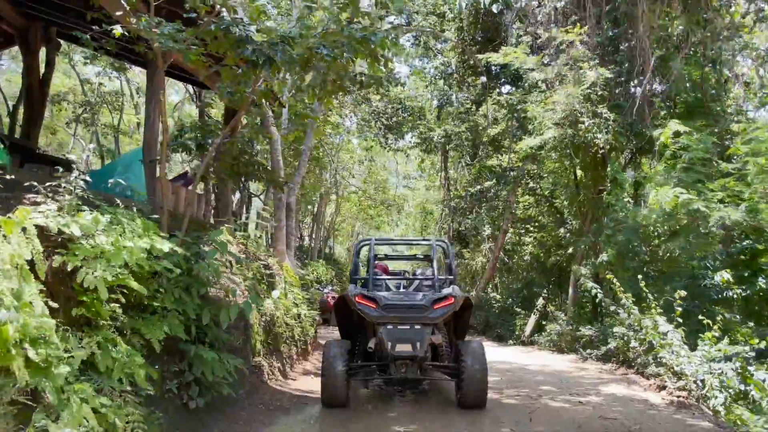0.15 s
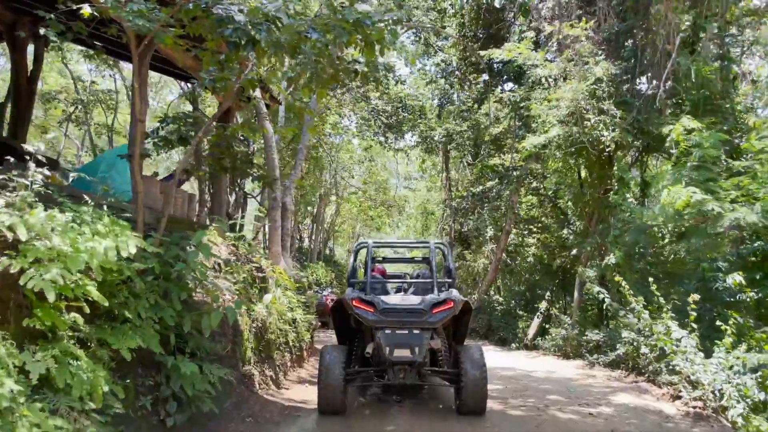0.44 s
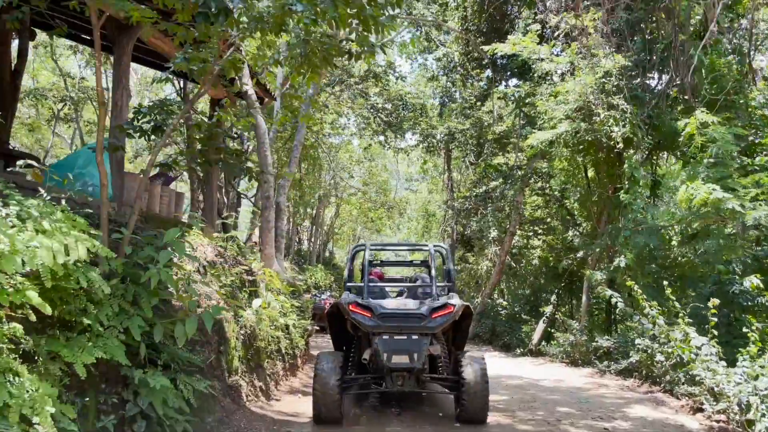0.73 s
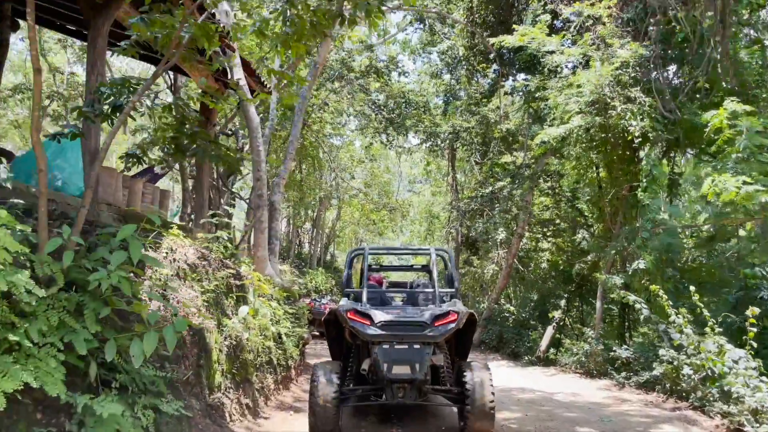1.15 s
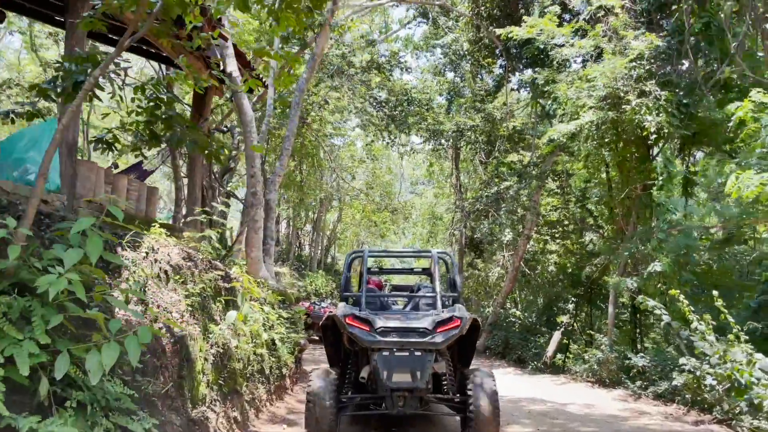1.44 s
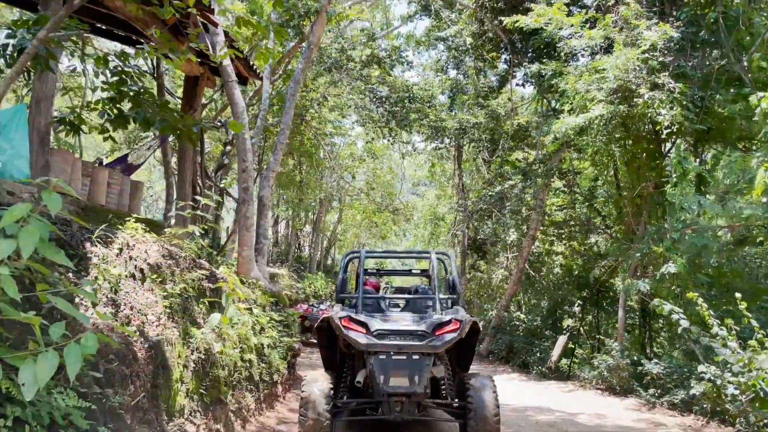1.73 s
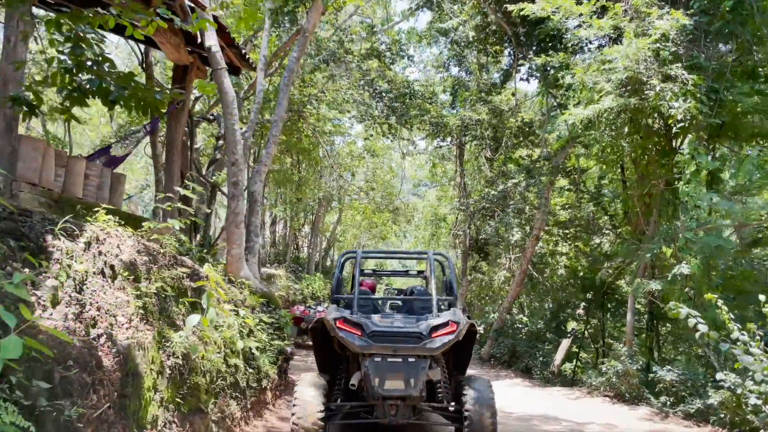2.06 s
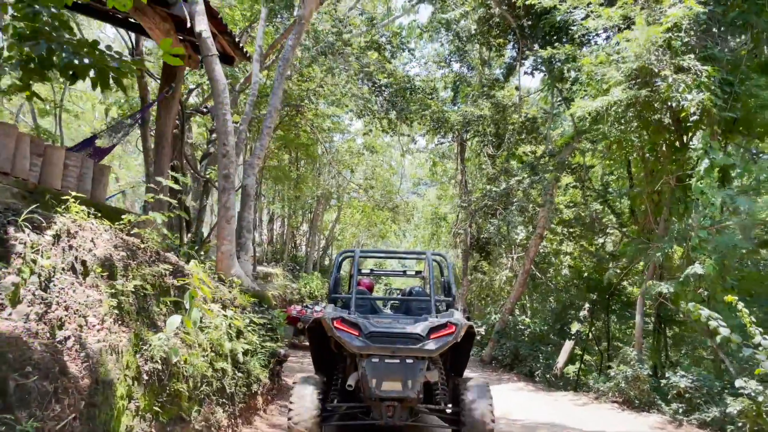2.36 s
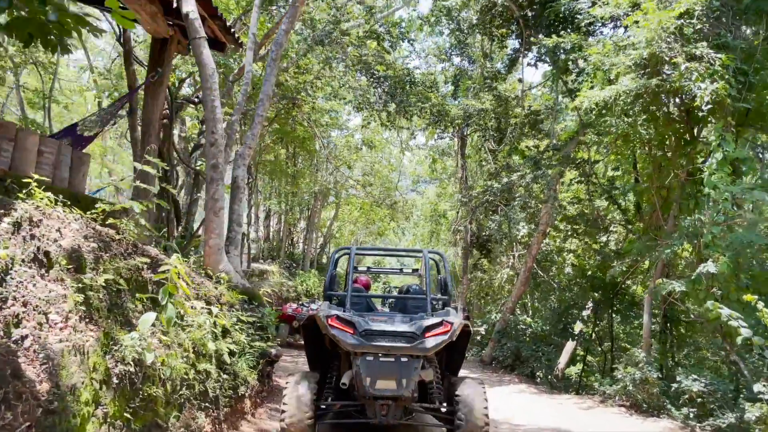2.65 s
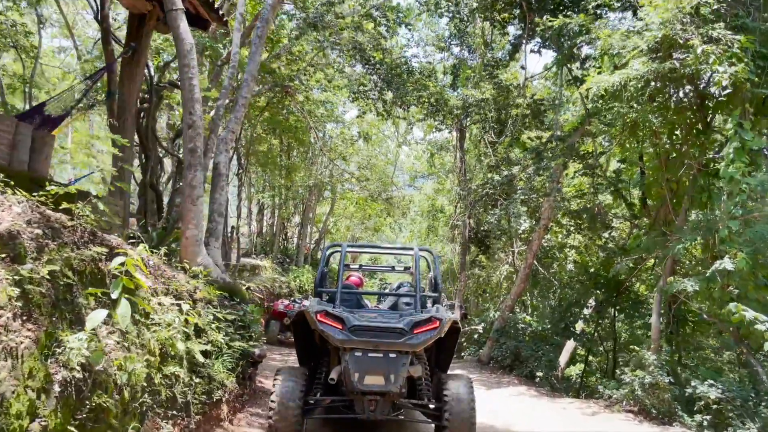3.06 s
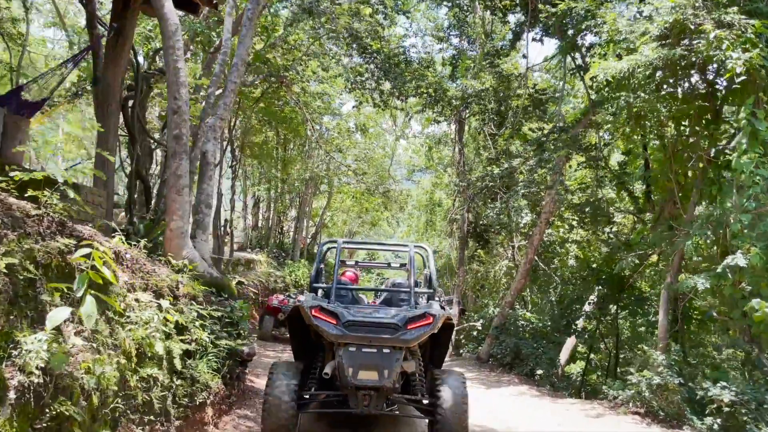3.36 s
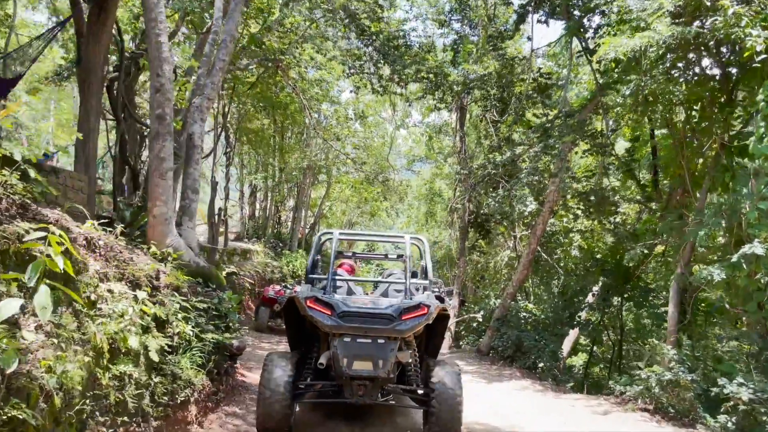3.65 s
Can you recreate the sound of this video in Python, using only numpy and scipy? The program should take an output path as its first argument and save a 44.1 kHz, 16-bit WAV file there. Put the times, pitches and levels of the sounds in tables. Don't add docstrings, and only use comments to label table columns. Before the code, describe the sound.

An off-road buggy engine throbs low and unevenly over crunching dirt with loose plastic knocks.

```python
import sys
import numpy as np
from scipy import signal
from scipy.fft import rfft, irfft
from scipy.io import wavfile
from scipy.ndimage import uniform_filter1d

SR = 44100
rng = np.random.default_rng(int(sys.argv[2]) if len(sys.argv) > 2 else 0)


def pcm_store(signal):
    levels = np.round(np.clip(np.atleast_2d(signal), -1, 1) * 32767)
    wavfile.write(sys.argv[1], SR, levels.astype(np.int16).T)


def natural_amplitude(level_db):
    exponent = np.asarray(level_db, float) / 20
    return 10 ** exponent


N = 167580


def evened(x):
    return x / np.sqrt(np.mean(x ** 2) + 1e-20)


def read(points, hz):
    f, value = np.transpose(points)
    return np.interp(np.log(hz + 1), np.log(f + 1), value)


def control(table, column):
    rows = np.array(table)
    return np.interp(np.arange(N) / SR, rows[:, 0], rows[:, column])


def wander(smooth_s):
    size = int(smooth_s * SR) + 1
    smooth = uniform_filter1d(rng.standard_normal(N), size)
    return evened(uniform_filter1d(smooth, size))


def resonate(x, hz, width):
    pole = np.exp((2j * np.pi * hz - np.pi * width) / SR)
    once = signal.lfilter([1], [1, -pole], x + 0j)
    return signal.lfilter([1], [1, -pole], once).real


# frequency in Hz, correlation from 0 to 1.
LIKENESS = [(60, .99), (200, .96), (380, .9), (600, .35), (2000, .55), (5000, .6), (7500, .5), (13000, .5)]
# frequency in Hz, left over right in dB.
PORT_LEVEL = [(60, 0.5), (130, 1.0), (290, -1.0), (640, 1.5), (1410, 3.0), (3100, 0.5), (6820, 4.0),
              (15000, 0.0)]
# frequency in Hz, lead of the left in radians.
PORT_PHASE = [(60, .02), (520, .9), (1720, -.4), (3010, 1.7), (6720, -1.)]


def noise(colour, patchy_db):
    frames, hz = N // 128 + 5, np.fft.rfftfreq(512, 1 / SR)
    a, b, c, d, patches = rng.standard_normal((frames, 257, 5)).T
    patches = evened(uniform_filter1d(uniform_filter1d(patches, 6, 0), 14, 1))
    same = np.clip(read(LIKENESS, hz), -1, 1)[:, None]
    shared, private = a + 1j * b, c + 1j * d
    port = (natural_amplitude(read(PORT_LEVEL, hz)) * np.exp(1j * read(PORT_PHASE, hz)))[:, None]
    z = np.array([port * shared, same * shared + np.sqrt(1 - same ** 2) * private])
    outside = (hz < colour[0][0] / 2) | (hz > colour[-1][0] * 1.2)
    z *= natural_amplitude((read(colour, hz) - 80 * outside)[:, None] + patchy_db * patches)
    return evened(signal.istft(z, nperseg=512, noverlap=384)[1][:, :N])


# frequency in Hz, density in dB per Hz.
RUMBLE_COLOUR = [(40, -16.5), (120, 2.5), (240, -18), (330, -10.5), (480, -14.5), (700, -18.5),
                 (950, -34.5), (1500, -40.5)]
# time in seconds, load in dB.
ENGINE_LOAD = [(0, 1), (.4, 2), (.6, -4), (1.05, -4), (1.25, 4.5), (1.5, 4), (1.85, -2.5), (2.08, 4.5),
               (2.25, -3), (2.45, 2.5), (2.6, -2.5), (2.85, 3), (3, -7), (3.35, -13.5), (3.5, -4.5),
               (3.8, -1)]


def rumble(blow):
    level_db = -29 - 0.04 * control(ENGINE_LOAD, 1)
    return noise(RUMBLE_COLOUR, patchy_db=2.5) * natural_amplitude(level_db) * (1.28 + 0.3 * blow)


# frequency in Hz, level in dB, decay by 60 dB in seconds.
METAL_MODES = [(938, 1, 0.044), (1347, 0.5, 0.034), (1583, -1.5, 0.021), (2264, -4.5, 0.026),
               (2515, -8.5, 0.043), (3580, -12, 0.023), (4230, -27.5, 0.021), (1874, -0.5, 0.014),
               (5130, -13.5, 0.029), (6080, -12, 0.022)]


def rattle():
    struck = rng.random((2, N)) < 1500 / SR
    taps = natural_amplitude(3.7 * np.minimum(rng.exponential(1, (2, N)), 3)) * struck
    part, out = rng.integers(0, len(METAL_MODES), (2, N)), np.zeros((2, N))
    shake = wander(0.048)
    for k, (hz, db, t60_s) in enumerate(METAL_MODES):
        clumps = natural_amplitude(3.2 * np.roll(shake, k * SR // 5))
        out += natural_amplitude(db) * evened(resonate(taps * (part == k) * clumps, hz, 3.4 / t60_s))
    crosstalk = np.array([[.6], [.2]])
    return evened(out + crosstalk * out[::-1])


# time in seconds, tyre crunch in dB, brush swish in dB.
GROUND = [(0.0, -38, -54), (0.18, -35, -51), (0.68, -39.5, -57), (0.95, -40.5, -58), (1.2, -38.5, -56.5),
          (1.34, -35, -53), (1.51, -37, -55.5), (1.94, -37.5, -61.5), (2.16, -44, -70), (2.27, -51, -71.5),
          (2.45, -45.5, -71.5), (2.65, -39, -65), (2.83, -36.5, -64), (2.96, -39.5, -66.5),
          (3.05, -51.5, -73), (3.21, -49.5, -70.5), (3.4, -49.5, -71.5), (3.8, -50, -70.5)]
# frequency in Hz, density in dB per Hz.
CRUNCH_COLOUR = [(300, -15), (480, -3), (760, -9), (1150, -13), (2000, -13), (2620, -14.5), (2800, -18.5),
                 (5200, -24), (7500, -37)]
# frequency in Hz, density in dB per Hz.
SWISH_COLOUR = [(3500, -8.5), (6000, -5.5), (8000, -3.5), (10000, -2.5), (13200, -9.5), (15000, -14.5),
                (16500, -12.5)]


def ground(blow):
    grains = rng.random(N) < 200 / SR
    grit = evened(uniform_filter1d(natural_amplitude(3.0 * np.minimum(rng.exponential(1, N), 3)) * grains, 200))
    crunch_db, swish_db = control(GROUND, 1), control(GROUND, 2)
    metal_db = -5 - 0.4 * (crunch_db + 42.0)
    crunch = noise(CRUNCH_COLOUR, patchy_db=2.0) + natural_amplitude(metal_db) * rattle()
    crunch *= natural_amplitude(crunch_db + 5.5 + 0.66 * wander(0.052)) * (0.72 + 0.13 * blow + 0.1 * grit)
    swish = noise(SWISH_COLOUR, patchy_db=3.0)
    swish *= natural_amplitude(swish_db + 10.0 + 1.25 * wander(0.061)) * (0.85 + 0.19 * grit)
    return crunch + swish


# frequency in Hz, density in dB per Hz.
LEAF_COLOUR = [(1000, -3.5), (3000, -5.5), (6000, -4), (9000, -2), (13000, -10.5), (15500, -4),
               (17000, -18.5)]


def leaf():
    rise_s, hold_s, fall_s = 0.011, 0.037, 0.026
    age = np.arange(N) / SR - 2.915
    left_s = rise_s + hold_s + fall_s - age
    shape = np.clip(np.minimum(age / rise_s, left_s / fall_s), 0, 1)
    push = np.exp(-(age / 0.019) ** 2) * np.sin(2 * np.pi * 32 * age)
    return natural_amplitude(-37) * shape ** 1.5 * noise(LEAF_COLOUR, patchy_db=1.5) + natural_amplitude(-12) * push


# start in seconds, length in seconds, level in dB, pitch in Hz.
BRAKE_SQUEAKS = [
    (0.074, 0.078, -58, 11200),
    (2.422, 0.13, -67, 11800),
    (2.415, 0.034, -57.5, 7270),
    (2.526, 0.03, -47, 11285),
    (2.557, 0.051, -52, 11230),
    (3.283, 0.037, -49.5, 11300),
    (3.319, 0.063, -58, 11200),
    (3.72, 0.031, -67, 11200),
]


def squeaks():
    t, out = np.arange(N) / SR, np.zeros(N)
    flutter, drift = wander(0.0043), wander(0.0068)
    for start_s, length_s, db, hz in BRAKE_SQUEAKS:
        u = np.clip((t - start_s) / length_s, 0, 1)
        tone = np.sin(2 * np.pi * np.cumsum(hz + 25 * drift) / SR)
        out += natural_amplitude(db + 11 + 4.6 * flutter) * np.sin(np.pi * u ** 0.39) * tone
    port_lag_s = 3.2e-5
    return np.array([np.roll(out, round(port_lag_s * SR)), out])


# time in seconds, level in dB, decay by 60 dB in seconds, brightness from 0 to 1.
PART_KNOCKS = [(0.352, -11.5, 0.17, 0.17), (0.69, -18.5, 0.54, 0.16), (1.171, -11.5, 0.24, 0.13),
               (1.245, -12, 0.42, 0.47), (2.046, -18.5, 0.25, 0.7), (2.189, -21.5, 0.37, 0.64),
               (2.498, -11, 0.24, 0.28), (2.555, -12, 0.24, 0.45), (2.355, -24, 0.18, 0.9),
               (2.434, -25, .15, .8), (2.804, -7.5, 0.21, 0.47), (3.015, -18.5, 0.27, .1),
               (3.455, -37, 0.075, 0.3), (3.519, -21.5, 0.26, 0), (3.608, -20.5, 0.3, 0.27),
               (3.689, -13, 0.23, 0.37)]
# frequency in Hz, density in dB per Hz.
DULL_COLOUR = [(300, -21), (500, 5), (950, 1.5), (1400, -9.5), (2200, -20.5), (4000, -39.5)]
# frequency in Hz, density in dB per Hz.
BRIGHT_COLOUR = [(700, -19.5), (1300, -1), (2100, 0.5), (3000, -8), (4200, -15), (7000, -24.5),
                 (12000, -47)]


def knocks():
    t, dull, bright = np.arange(N) / SR, np.zeros(N), np.zeros(N)
    for start_s, db, t60_s, brightness in PART_KNOCKS:
        age = np.maximum(t - start_s, 0)
        shape = np.minimum(age / 0.0016, 1) * natural_amplitude(db - 12.5 - 60 * age / t60_s)
        dull += (1 - brightness) * shape
        bright += brightness * shape
    return dull * noise(DULL_COLOUR, patchy_db=1.0) + bright * noise(BRIGHT_COLOUR, patchy_db=1.0)


def burst(hz, open_s, phase):
    length_s = open_s * 1.5
    u = np.arange(int(length_s * SR)) / (length_s * SR)
    return np.sin(np.pi * u ** 0.68) * np.sin(2 * np.pi * hz * length_s * u - phase)


# time in seconds, firing cycles per second.
LOPE_SPEED = [(0.0, 17.23), (0.3, 15.33), (0.55, 22.72), (0.75, 9.06), (1.05, 20.5), (1.3, 17.27),
              (1.6, 17.65), (1.9, 17.3), (2.1, 13.38), (2.33, 12.55), (2.6, 17.72), (2.85, 16.58),
              (3.1, 11.41), (3.33, 18.2), (3.6, 11.2), (3.8, 9.56)]


def lope_starts():
    cycles = .23 + np.cumsum(control(LOPE_SPEED, 1)) / SR
    return np.flatnonzero(np.diff(np.floor(cycles), prepend=-1))


# time in seconds, strength in dB, exhaust note in Hz.
STRONG_FIRINGS = [(0.007, 3, 132.4), (0.054, 1.5, 133), (0.201, 0.5, 131), (0.229, 4.2, 135),
                  (0.307, -3.6, 131), (0.356, 2, 133.6), (0.471, -5.3, 131.4), (0.582, -2.7, 137),
                  (0.692, -0.8, 128), (0.772, 0.8, 129.4), (0.915, 0, 137), (0.968, -1.9, 127),
                  (1.18, 0.6, 128.5), (1.231, -2, 135), (1.299, 1.5, 132), (1.35, 1.5, 139),
                  (1.407, 0.5, 141.6), (1.463, -2.3, 140), (1.522, 0, 138), (1.581, 1, 137),
                  (1.625, -2, 130), (1.701, 3, 142.3), (1.757, 4.5, 127.8), (1.817, 0.2, 153.4),
                  (1.877, 2.7, 143.5), (1.922, 1.5, 138.5), (1.993, -2.7, 124), (2.054, 2.5, 122),
                  (2.152, -4, 140.3), (2.192, 1.5, 133), (2.267, 0, 125), (2.302, -6.5, 132),
                  (2.349, -2, 128.7), (2.438, 1.3, 117), (2.502, 2.4, 129.7), (2.565, 1, 138.5),
                  (2.624, -0.5, 149), (2.676, 4, 127), (2.735, 5.3, 137), (2.787, 1.5, 132.4),
                  (2.848, -3.7, 129.7), (2.977, -1.5, 112), (3.08, -0.5, 119.4), (3.129, 4.5, 134.4),
                  (3.217, 1, 129), (3.323, 2.8, 123), (3.399, 0.5, 131.8), (3.562, 3.5, 131),
                  (3.618, 2, 139.3), (3.643, -1.3, 127), (3.697, -2, 131.4), (3.73, -1.3, 139.3),
                  (3.783, 3, 137)]
# time in seconds, strength in dB.
WEAK_FIRINGS = [(0.099, -4.5), (0.128, -2), (0.154, -2.5), (0.33, -18), (0.383, -7.5), (0.431, -1.2),
                (0.498, 0.8), (0.637, -1.5), (0.667, -2.9), (0.851, -2), (0.939, -0.5), (1.029, -1),
                (1.097, -2.5), (1.132, -6), (1.258, -7), (1.495, -4), (1.652, -4.5), (1.792, -8),
                (1.852, -8), (2.123, -5.5), (2.541, -3.9), (2.904, -4), (3.003, -10), (3.027, -6),
                (3.107, -3.5), (3.293, -1), (3.442, -1.5), (3.474, -3.5), (3.51, -1)]
# frequency in Hz, ring in seconds while the valve is open,
# level in dB, share of the load followed, left over right in dB.
EXHAUST_MODES = [(71.1, 0.044, -29, 0.068, -6), (95.1, 0.04, -23.5, .1, 1.5), (121.8, 0.031, -24, 0.05, 0),
                 (137, .03, -16.5, 0.1, 2), (171, 0.03, -28, 0.11, 1.5), (202, 0.034, -35, 1.8, 4.5),
                 (276.7, 0.02, -38.5, 0.34, -4), (373, 0.026, -29, 1.36, -1.5), (523.6, 0.036, -47, 5.4, 2)]


def engines():
    note_hz = 130
    weak_hz = note_hz * (1 + .05 * rng.standard_normal(len(WEAK_FIRINGS)))
    weak = np.column_stack([WEAK_FIRINGS, weak_hz])
    fire_s, strength_db, fire_hz = np.vstack([STRONG_FIRINGS, weak]).T
    fired = (np.maximum(fire_s - .004, 0) * SR).astype(int)
    lope = lope_starts()

    clicks, t, out = np.zeros(N), np.arange(3000) / SR, np.zeros((2, N))
    clicks[fired] = natural_amplitude(1.08 * strength_db)
    blow = evened(signal.oaconvolve(clicks, t * np.exp(-t / .012 * 2))[:N])
    puffs = (.15 + blow) * rng.standard_normal((2, N))
    scatter = rng.standard_normal((len(fired), len(EXHAUST_MODES)))

    for k, (hz, open_s, db, share, lean_db) in enumerate(EXHAUST_MODES):
        push = natural_amplitude(share * control(ENGINE_LOAD, 1))
        if hz < 230:
            starts, bend, drive = fired, fire_hz / note_hz, clicks * push
        else:
            starts, bend, drive = lope, 1 + .015 * scatter[:, k], push
        spread_db = 1.2 * abs(np.log2(hz / note_hz)) * scatter[:len(starts), k - 1]
        gains = drive[starts] * natural_amplitude(spread_db)
        phase = np.pi * k * (1.0 - .11 * k)
        kick = np.zeros(N + SR)
        for start, gain, bent_hz in zip(starts, gains, hz * bend):
            tone = burst(bent_hz, open_s, phase)
            kick[start:start + len(tone)] += gain * tone

        ring = burst(hz, open_s, 0)
        rough, apart = (evened(signal.oaconvolve(puff * push, ring)[:N]) for puff in puffs)
        mid = .8 * evened(kick[:N]) + .2 * rough
        same = np.clip(read(LIKENESS, hz), 0, 1)
        side = np.sqrt((1 - same) / (1 + same)) * np.array([apart, -apart])
        out += natural_amplitude(db) * (mid * natural_amplitude(np.array([[lean_db / 2], [-lean_db / 2]])) + side)
    hum = evened(resonate(rng.standard_normal(N), 137.2, 30))
    return out + natural_amplitude(-26.5) * hum, blow


def scene():
    engine, blow = engines()
    return rumble(blow) + ground(blow) + leaf() + squeaks() + knocks() + engine


def band_limit(x):
    return signal.sosfilt(signal.butter(12, 15660, fs=SR, output="sos"), x)


# frequency in Hz, gain in dB.
MID_GAIN = [(7000, -1), (7700, -12), (8300, -11.5), (9000, -10.5), (9600, -7), (10500, -4.5), (14500, 9),
            (15700, -9.5)]
# frequency in Hz, gain in dB.
SIDE_GAIN = [(40, -16), (160, 0), (11500, 0), (12450, -2), (12750, -60)]


def record(dry):
    low_cut = signal.butter(5, 55, "high", fs=SR, output="sos")
    cut = signal.sosfilt(low_cut, dry)
    power_db = 10 * np.log10(abs(uniform_filter1d((cut ** 2).mean(0), size=330)) + 1e-12)
    excess_db = uniform_filter1d(np.maximum(power_db + 12.5, 0), size=200)
    left, right = rfft(cut / natural_amplitude(.5 * excess_db))
    hz = np.fft.rfftfreq(N, 1 / SR)
    mid = (left + right) / 2 * natural_amplitude(read(MID_GAIN, hz))
    side = (left - right) / 2 * natural_amplitude(read(SIDE_GAIN, hz))
    return band_limit(irfft(np.array([mid + side, mid - side]), N))


dry = scene()
out = record(dry)
pcm_store(out)
```